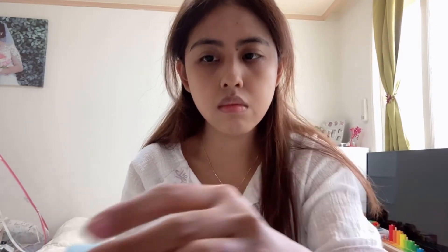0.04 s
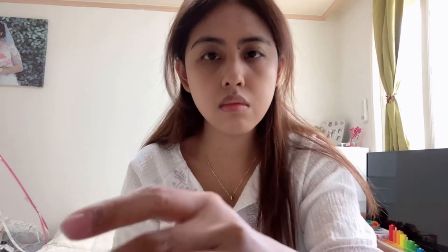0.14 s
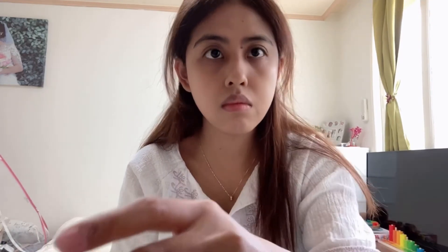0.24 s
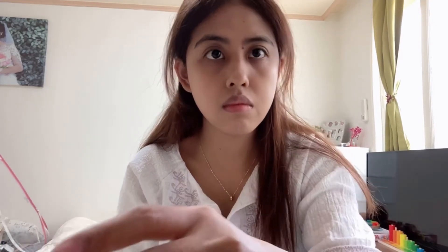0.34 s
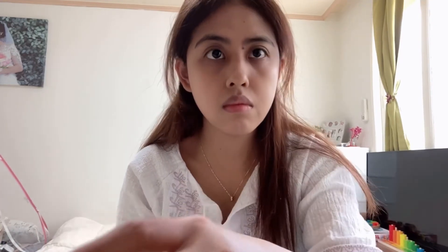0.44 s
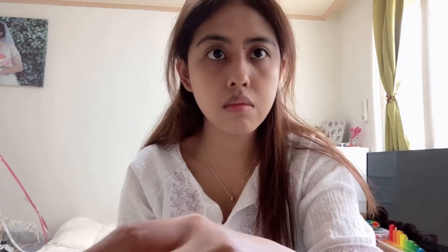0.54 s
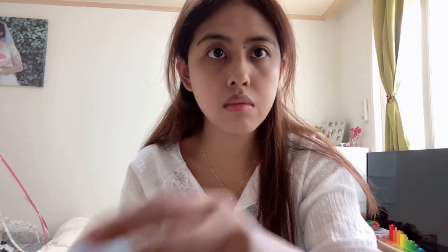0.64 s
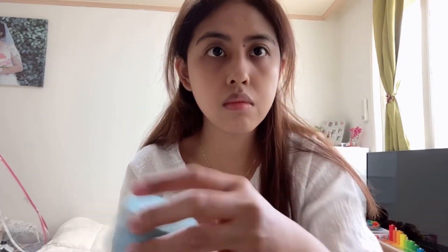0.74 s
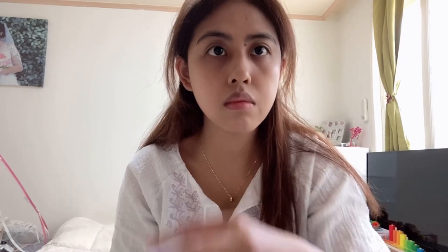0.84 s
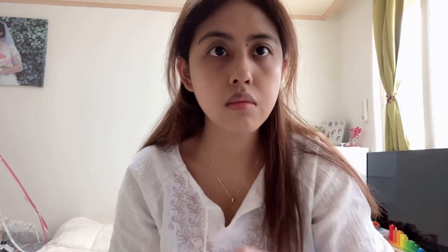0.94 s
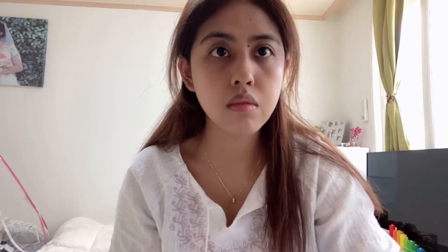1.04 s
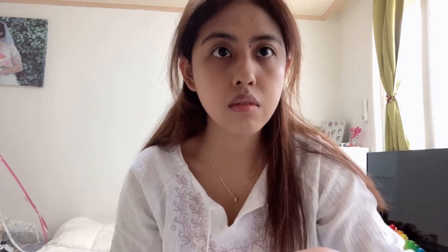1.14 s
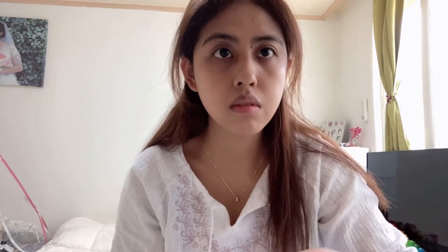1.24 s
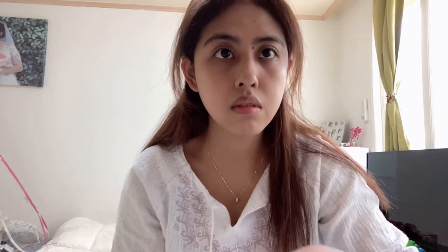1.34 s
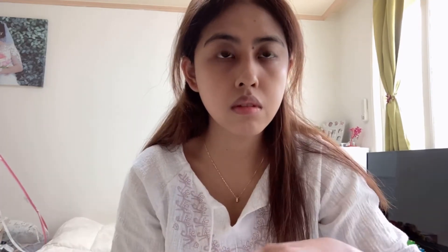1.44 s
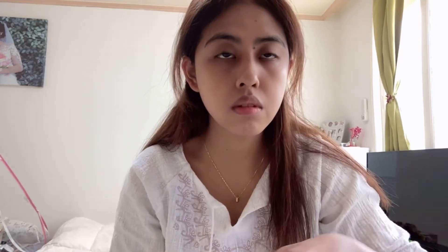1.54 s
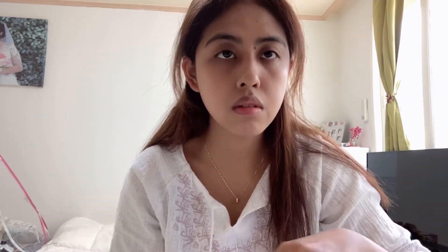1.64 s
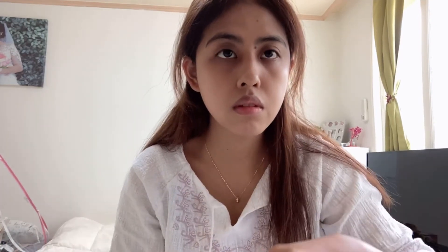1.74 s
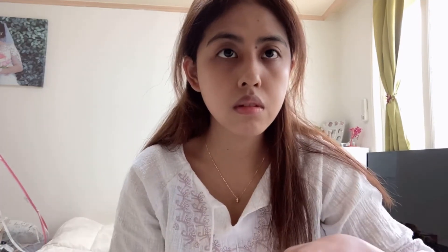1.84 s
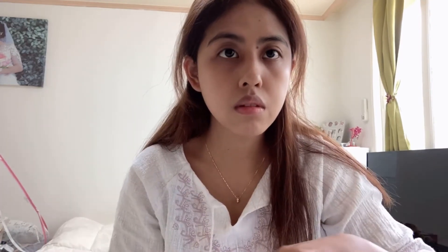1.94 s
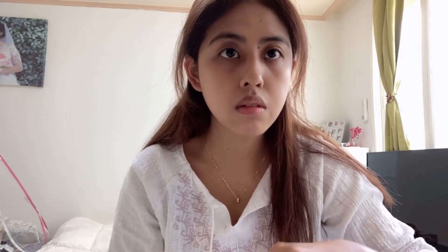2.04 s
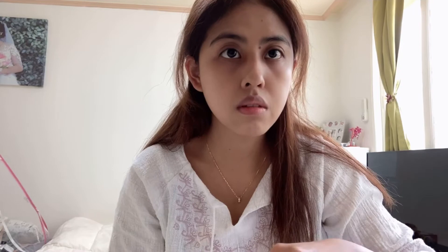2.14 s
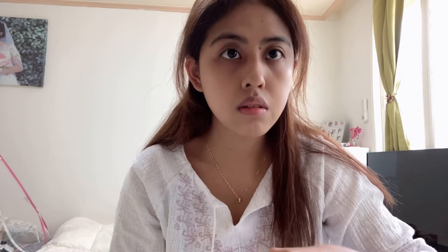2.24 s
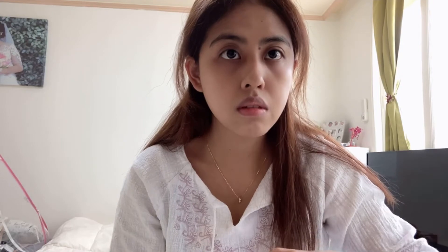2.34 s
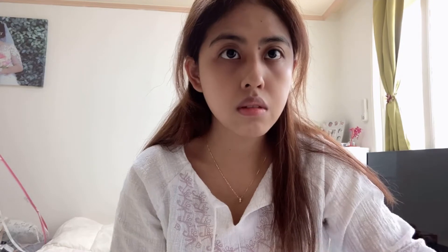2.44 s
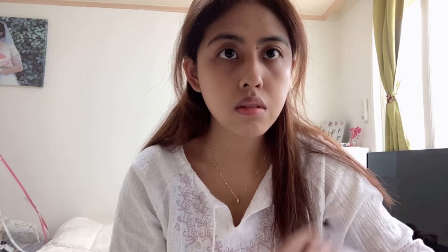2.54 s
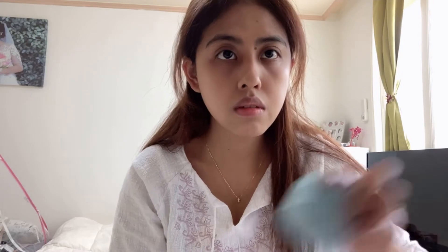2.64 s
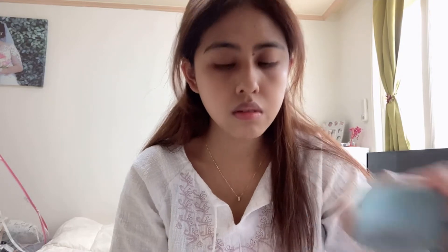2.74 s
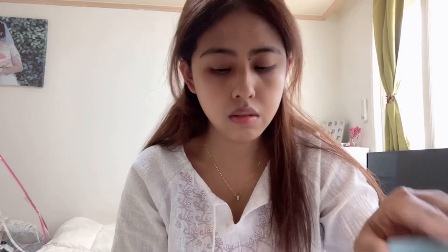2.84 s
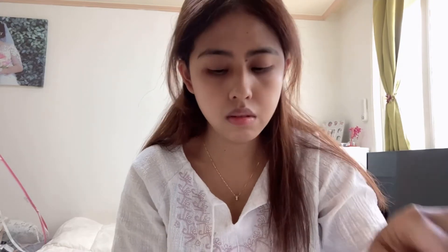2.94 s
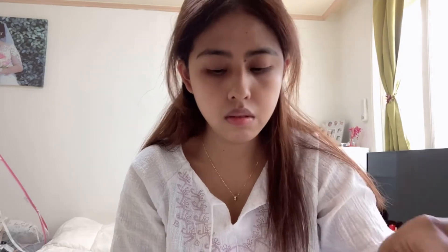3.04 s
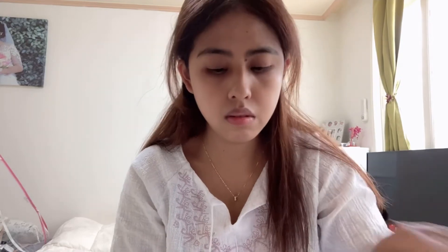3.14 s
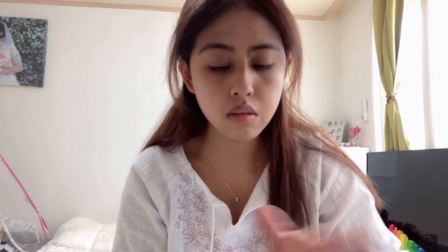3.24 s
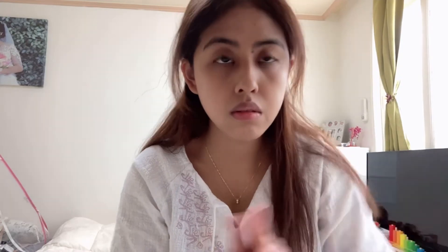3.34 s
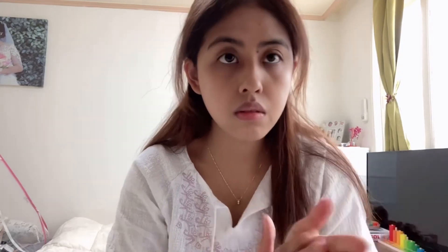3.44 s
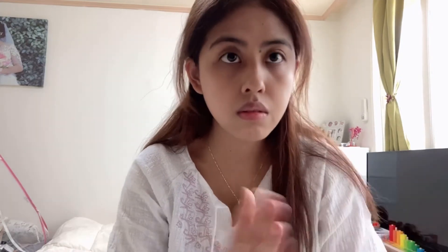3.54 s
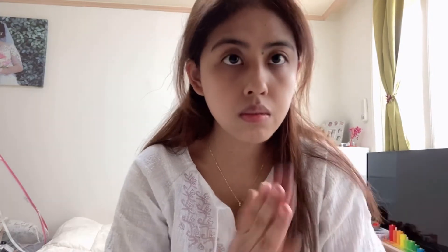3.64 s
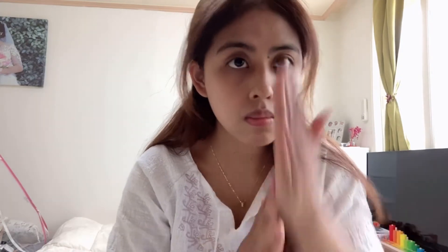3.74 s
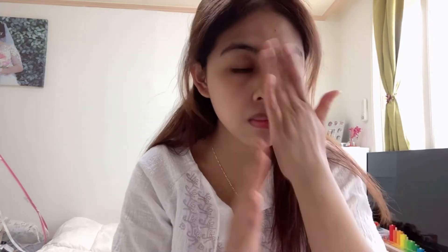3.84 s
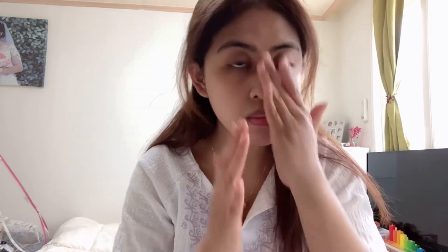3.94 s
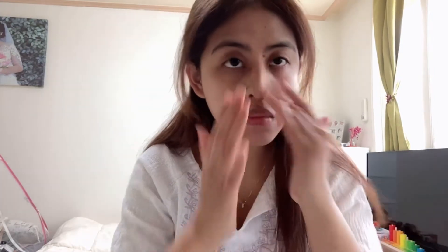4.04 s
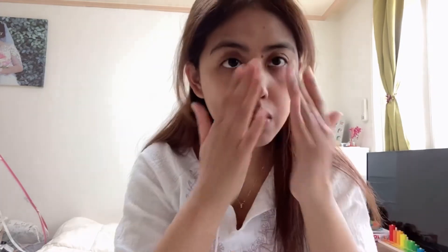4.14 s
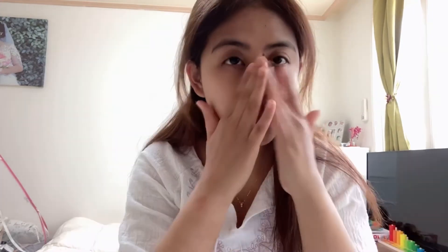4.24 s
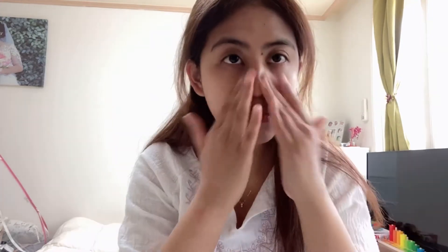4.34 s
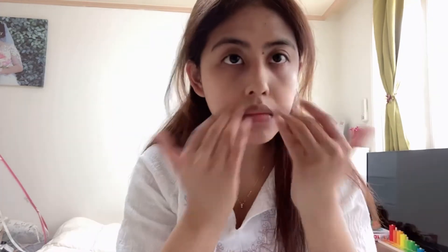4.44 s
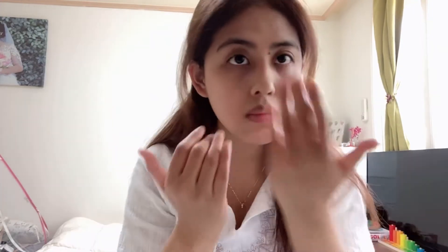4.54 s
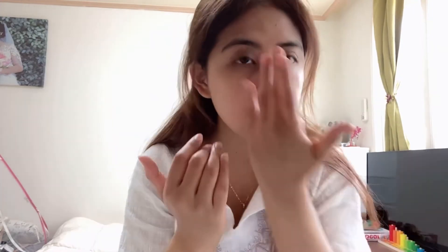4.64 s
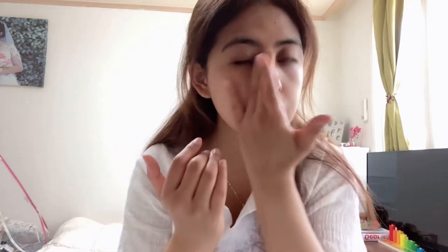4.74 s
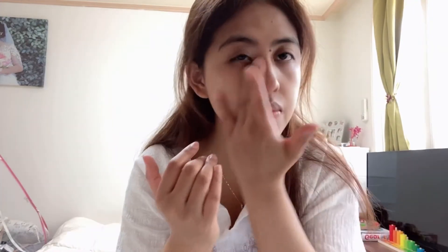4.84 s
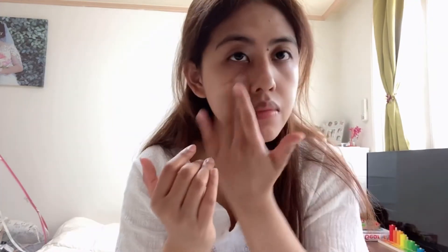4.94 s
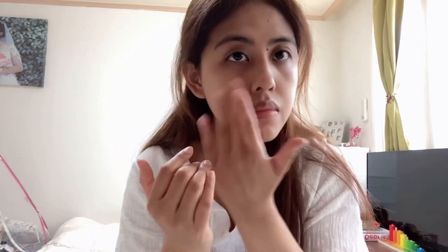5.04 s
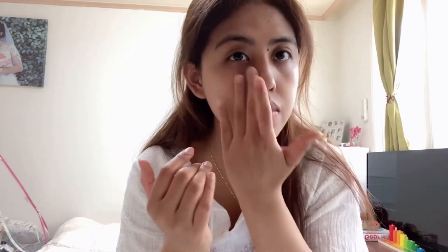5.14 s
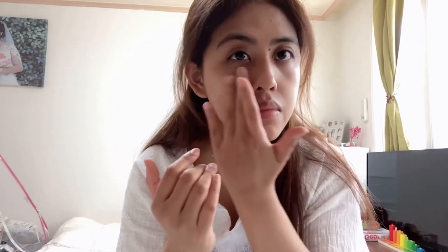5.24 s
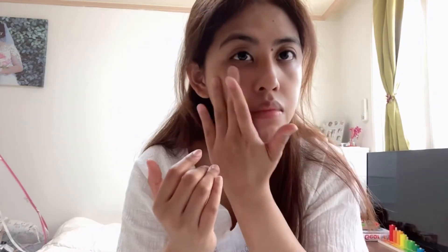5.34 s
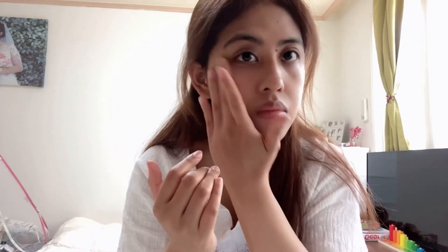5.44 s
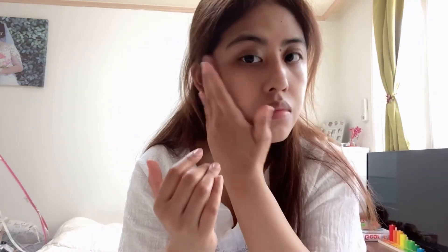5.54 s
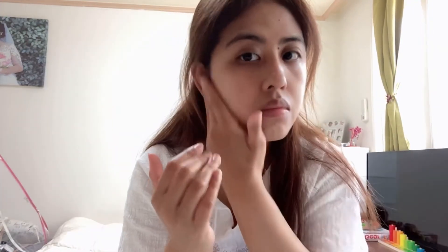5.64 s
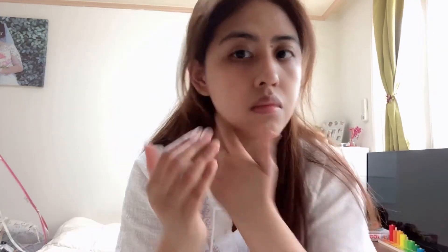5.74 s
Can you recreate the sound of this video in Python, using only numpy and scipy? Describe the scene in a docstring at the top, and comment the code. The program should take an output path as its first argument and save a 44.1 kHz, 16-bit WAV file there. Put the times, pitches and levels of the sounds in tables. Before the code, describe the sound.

A quiet small room with a low steady hum and light hiss, heard from close by. From about 0.1 to 0.5 s a hollow plastic bottle is handled: a quick cluster of knocks, taps and short scrapes, with dull bumps on a wooden table. After a lull, the pump works between 1.05 and 2.05 s: a soft sliding hiss, a crisp plastic click at 1.4, another at 1.5, a scrape and clicks near 1.7, then a lighter slide around 2.0. Faint birds chirp thinly outside until about 2.8 s. A faint brush at 2.7 leads to the loudest sound, a hard woody knock at 2.9 with a smaller one at 3.0. Palms meet softly at 3.2 and rub in airy, slightly hollow swishes until 3.7. Afterwards only barely audible finger strokes on skin, near 3.9, 4.3, 4.8 and 5.5, and a slight low rustle at the end.

```python
"""A quiet room with a wooden table: a plastic pump bottle is opened, pumped three times and set down.
Then palms meet, rub together and stroke the face; birds call faintly outside and the room hums.
Taps, blows and a soft clap are sums of damped modes; friction is coloured noise under stroke gains.
Birds are gliding sines, the room's hum is shaped noise, and the walls answer with a decaying noise tail."""
import sys
import numpy as np
from scipy import signal
from scipy.fft import rfft, irfft, next_fast_len
from scipy.io import wavfile
from scipy.ndimage import uniform_filter1d, map_coordinates

SR = 44100
rng = np.random.default_rng(int(sys.argv[2]) if len(sys.argv) > 2 else 0)


def wrap_up_sound(samples):
    """Save the sound to the file named by the first command line argument, as 16-bit audio."""
    columns = np.atleast_2d(samples).T
    # keep every value between -1 and 1, then stretch to whole-number steps
    tamed = np.clip(columns, -1, 1)
    steps = np.round(tamed * 32767).astype(np.int16)
    wavfile.write(sys.argv[1], SR, steps)


N = 255780  # length in samples


def amp(db):
    """Decibel law: the amplitude ratio of a level."""
    return 10 ** (np.asarray(db) / 20)


def unit(x):
    """Normalization by power: scale to an rms of 1."""
    return x / np.sqrt(np.mean(x ** 2) + 1e-20)


def along(points, hz):
    """Logarithmic frequency scale: interpolate (Hz, value) points on it."""
    point_hz, values = np.transpose(points)
    return np.interp(np.log(hz + 1), np.log(point_hz + 1), values)


def wobble(rate):
    """Band-limited random modulation: a smooth curve through `rate` random knots a second."""
    knots = rng.standard_normal(int(N * rate / SR) + 4)
    return map_coordinates(knots, [np.arange(N) * rate / SR])


def filtered(x, response):
    """Linear filtering: multiply the spectrum by a response of frequency."""
    size = next_fast_len(N + SR // 2)
    return irfft(rfft(x, size) * response(np.fft.rfftfreq(size, 1 / SR)), size)[:N]


def rush(spectrum, patchy_db, grain_db):
    """Noise shaping: coloured noise of rms 1, with random patches and a fast grain."""
    grainy = rng.standard_normal(N) * amp(grain_db * wobble(300))
    z = signal.stft(grainy, nperseg=512)[2]
    patches = uniform_filter1d(rng.standard_normal(z.shape), 6, axis=0)
    patches = uniform_filter1d(patches, 8, axis=1)
    x = signal.istft(z * amp(patchy_db * unit(patches)), nperseg=512)[1][:N]
    return unit(filtered(x, lambda hz: amp(along(spectrum, hz))))


def strokes(rows, catch_s, catch_db):
    """Amplitude envelope: the gain of strokes that catch fast, swell to a peak, hold and fade."""
    sag_db, quiet_db = -1.5, -36  # below the peak: after the hold, at both ends
    out = np.zeros(N + SR)
    for s, swell, hold, fade, db in rows:
        catch = min(catch_s, swell / 2)
        knots = np.cumsum([0, catch, swell - catch, hold, fade])
        t = np.arange(round(knots[-1] * SR)) / SR
        shape_db = np.interp(t, knots, [quiet_db, catch_db, 0, sag_db, quiet_db])
        out[round(s * SR):][:len(t)] += amp(db + shape_db)
    return out[:N]


def ring(modes, spread_db, detune, share):
    """Modal superposition: damped sines with random strengths and shifts; share scales the ring time."""
    t = np.arange(SR // 6) / SR
    hz, db, t60 = np.transpose(modes)[..., None]
    hz = hz * (1 + detune * rng.standard_normal(hz.shape))
    db = db + spread_db * rng.standard_normal(db.shape)
    decay = amp(db - 60 * t / (share * t60))
    rise = 1 - np.exp(-t * hz / 1.2)  # low modes build up more slowly
    return (decay * np.sin(2 * np.pi * hz * t) * rise).sum(axis=0)


def dying(decay, level_db):
    """Diffuse decay: a noise burst in which each frequency dies at its own speed."""
    onset_s = .0006
    hz, t, z = signal.stft(rng.standard_normal(SR // 2), SR, nperseg=128)
    fall_db = level_db(hz)[:, None] - 60 * t / along(decay, hz)[:, None]
    x = signal.istft(z * amp(fall_db), SR, nperseg=128)[1]
    rise = np.minimum(np.arange(len(x)) / SR / onset_s, 1)
    return x * np.sin(np.pi / 2 * rise) ** 2


def add(out, s, db, sound):
    """Linear superposition: lay a sound at time s with its peak at db."""
    out[round(s * SR):][:len(sound)] += amp(db) * sound / np.abs(sound).max()


# spectrum of the room's hum and hiss: pitch_hz [Hz], level_db [relative dB per Hz]
ROOM_SPECTRUM = [(12, -39), (20, -15), (81, 1), (107, -14), (301, -13.5), (376, -23), (484, -16),
                 (526, -19.5), (1180, -29), (1320, -27), (2970, -31.5), (4520, -32.5), (5650, -34),
                 (10200, -38), (15900, -43)]
# low noise that rises at the end: start_s [s], swell_s [s], hold_s [s], fade_s [s], level_db [dB]
LATE_SWELL = [(5.69, 0.024, .08, .1, -58)]
# spectrum of that low noise: pitch_hz [Hz], level_db [relative dB per Hz]
SWELL_SPECTRUM = [(110, -39.5), (180, -22), (234, -3), (333, 1), (690, -11), (745, -20), (2500, -25),
                  (3250, -55), (5500, -120)]


def air():
    """Stationary background noise: the room's hum and hiss, with a low noise rising at the end."""
    steady = amp(-59) * rush(ROOM_SPECTRUM, patchy_db=1.2, grain_db=0.5)
    low_noise = rush(SWELL_SPECTRUM, patchy_db=0.5, grain_db=-0.5)
    return steady + strokes(LATE_SWELL, catch_s=.026, catch_db=-7) * low_noise


# bird notes: start_s [s], length_s [s], first_hz [Hz], last_hz [Hz], level_db [dB before flutter]
BIRD_NOTES = [(0.087, 0.042, 5400, 5000, -72), (0.125, 0.094, 4150, 3550, -69.5),
              (0.649, 0.07, 3450, 3200, -72), (.74, .03, 3350, 3300, -71), (.425, 0.033, 4750, 4460, -61),
              (0.458, 0.04, 4100, 4030, -68), (1.385, 0.023, 4300, 4200, -76),
              (1.428, .015, 4500, 4460, -83), (1.83, 0.034, 4510, 4420, -62),
              (2.079, 0.019, 6530, 6340, -66.5), (2.113, 0.015, 5380, 5200, -60),
              (2.125, 0.034, 4900, 3940, -63), (2.249, 0.026, 4330, 4760, -64.5),
              (2.3, 0.058, 3450, 3250, -70), (2.478, 0.062, 4700, 3830, -65.5),
              (2.677, .03, 5250, 5380, -71), (2.704, 0.1, 4440, 3600, -75)]


def birds():
    """Frequency modulation: short unsteady whistles whose pitch moves fast and then levels."""
    out = np.zeros(N)
    for s, length, first_hz, last_hz, db in BIRD_NOTES:
        u = np.linspace(0, 1, round(length * SR))
        pitch_hz = last_hz + (first_hz - last_hz) * (1 - u) ** 2
        swell = np.sin(np.pi * np.sqrt(u)) ** 2  # rises faster than it falls
        whistle = np.sin(2 * np.pi * np.cumsum(pitch_hz) / SR)
        out[round(s * SR):][:len(u)] += amp(db) * swell * whistle
    flutter = amp(2.8 * wobble(78))
    return out * flutter


# palm on palm: start_s [s], swell_s [s], hold_s [s], fade_s [s], level_db [dB at the peak],
# first_hz [Hz], last_hz [Hz] of the hollow between the palms
PALM_RUBS = [(3.222, 0.011, 0.0042, .07, -50, 2520, 2500), (3.245, 0.066, 0.042, 0.041, -53, 2520, 2010),
             (3.372, .065, 0.055, 0.033, -45, 2720, 2320), (3.518, 0.066, 0.035, .17, -43, 2870, 2710)]
# spectrum of rubbing palms: pitch_hz [Hz], level_db [relative dB per Hz]
PALM_SPECTRUM = [(530, -63), (900, -34), (1240, -12.5), (2060, -5.5), (2380, -4.5), (2680, -12), (3020, -1),
                 (3490, -9), (4280, -8.5), (5240, -2), (11700, -5), (14400, -3), (15800, -11.5)]
# fingers on skin: start_s [s], swell_s [s], hold_s [s], fade_s [s], level_db [dB at the peak]
FINGER_STROKES = [(.745, .09, .03, .08, -71.5), (.9, .025, 0.012, .06, -69.5), (2.655, .1, .03, .15, -62),
                  (3.85, .03, 0.033, .12, -67), (3.945, .03, .015, .1, -65), (4.18, 0.17, .03, .08, -59),
                  (4.72, .12, .04, .13, -64), (5.355, .09, 0.083, 0.17, -66.5), (5.52, .1, .05, 0.09, -63)]
# spectrum of fingers on skin: pitch_hz [Hz], level_db [relative dB per Hz]
FINGER_SPECTRUM = [(1470, -36.5), (2500, -10.5), (2850, -6.5), (4600, -11), (7950, -5), (9720, -6.5),
                   (15800, -6)]


def hands():
    """Cavity resonance: cupped palms colour their friction as their shape moves; fingers whisper."""
    hz, t, z = signal.stft(rush(PALM_SPECTRUM, patchy_db=1.5, grain_db=.8), SR, nperseg=512)
    cup = []
    for s, swell, hold, fade, db, first_hz, last_hz in PALM_RUBS:
        cup += [(s, first_hz), (s + swell + hold, last_hz)]
    cup_hz = np.interp(t, *np.transpose(sorted(cup)))
    hollow = 1 + amp(1.5) * np.exp(-((hz[:, None] - cup_hz) / 350) ** 2)  # 350 Hz sets the width
    palm_noise = unit(signal.istft(z * hollow, SR, nperseg=512)[1][:N])
    palm_gain = strokes([row[:-2] for row in PALM_RUBS], catch_s=.026, catch_db=-7)
    finger_noise = rush(FINGER_SPECTRUM, patchy_db=2.0, grain_db=0.54)
    finger_gain = strokes(FINGER_STROKES, catch_s=.025, catch_db=-11)
    return palm_gain * palm_noise + finger_gain * finger_noise


# plastic sliding on plastic in the cap and the pump: start_s [s], swell_s [s], hold_s [s], fade_s [s],
# level_db [dB of the hiss at the peak], shake_db [dB of the shaken shell above the hiss]
PLASTIC_SLIDES = [(0.206, .012, .004, .03, -65, -7), (.25, 0.034, .02, 0.051, -61, 6),
                  (0.31, 0.016, .035, 0.092, -54, -3), (0.38, .07, .008, .05, -56.5, -12),
                  (1.064, 0.05, 0.1, .17, -50.5, 0.5), (1.296, .014, .004, 0.063, -65, -10),
                  (1.405, 0.0086, .003, .03, -39.5, -24), (1.421, 0.011, .09, .09, -49.5, -21),
                  (1.671, .05, 0.011, 0.084, -44, -8), (1.971, 0.018, 0.0043, 0.072, -51, -7),
                  (2.026, 0.032, .01, 0.083, -61, -1)]
# spectrum of the sliding hiss: pitch_hz [Hz], level_db [relative dB per Hz]
SLIDE_SPECTRUM = [(1290, -34.5), (2200, -9), (2490, -6), (2860, -7), (3160, -1.5), (3980, -11.5),
                  (5630, -10.5), (6480, -9.5), (7160, -9.5), (10200, -6), (12600, -10), (14200, -1.5),
                  (15800, -15)]
# modes of the bottle's shell: pitch_hz [Hz], level_db [relative dB], t60_s [s before damping share]
SHELL_MODES = [(1080, -13, .03), (1318, -0.5, 0.039), (1393, -1.5, 0.041), (1496, -0.5, 0.088),
               (1640, 3.5, 0.05), (1670, -6.5, .03)]


def slides():
    """Friction excitation: sliding hisses and, in coarse jerks, shakes the shell of the bottle."""
    jerks = rng.standard_normal(N) * amp(4.6 * wobble(150))
    shell = ring(SHELL_MODES, spread_db=0, detune=0, share=.4)
    shaken = unit(signal.fftconvolve(jerks, shell)[:N])
    hiss = rush(SLIDE_SPECTRUM, patchy_db=1.5, grain_db=1.5)
    hiss_rows = [row[:-1] for row in PLASTIC_SLIDES]
    shake_rows = [(*shape, db + shake_db) for *shape, db, shake_db in PLASTIC_SLIDES]
    hiss_gain = strokes(hiss_rows, catch_s=.012, catch_db=-7.5)
    shake_gain = strokes(shake_rows, catch_s=.012, catch_db=-7.5)
    return hiss_gain * hiss + shake_gain * shaken


# taps on the bottle; the last row is the palms meeting in a soft clap:
# start_s [s], then the peak of each mode set: shell_db, boom_db, knock_db, click_db [dB]
TAPS_AND_CLAP = [(0.1244, -33, -32.5, -32.5, -62), (0.1865, -41, -28.5, -36.5, -85),
                 (0.2145, -23.5, -54, -25, -51), (0.2184, -40, -28.5, -48, -47),
                 (0.255, -19, -37, -26, -71), (0.2742, -21.5, -27, -22, -41),
                 (0.3081, -18.5, -15.5, -19, -48), (0.3291, -43, -30.5, -32, -37),
                 (0.3478, -31, -28, -29, -34.5), (0.365, -60, -35, -23.5, -43), (0.383, -58, -34, -58, -67),
                 (0.7985, -60, -47, -66, -62), (1.0545, -64, -45.5, -50.5, -59),
                 (1.1943, -39, -45.5, -40.5, -59.5), (1.2692, -62, -42, -47, -70.5),
                 (1.3142, -54, -54, -59, -68), (1.4069, -14.5, -32.5, -21, -21.5),
                 (1.4344, -54, -53, -51, -49), (1.473, -40.5, -58, -39, -63),
                 (1.49, -20.5, -33.5, -26.5, -34), (1.6761, -24, -33.5, -33, -47),
                 (1.7158, -21.5, -34, -27.5, -25), (1.9315, -44.5, -48, -45.5, -59),
                 (1.9574, -49, -47.5, -46, -63.5), (1.9847, -31.5, -43, -36.5, -42.5),
                 (3.2289, -55, -42.5, -44, -43)]
# modes of the table's boom, the bottle's knock and the hard click:
# pitch_hz [Hz], level_db [relative dB], t60_s [s before damping share]
BOOM_MODES = [(115.5, -4.5, 0.15), (158.9, -4.5, 0.084), (202.8, -3, .11), (241.6, -3, 0.08)]
KNOCK_MODES = [(327.4, -4, 0.025), (440, -3.5, 0.04), (501.7, 2, 0.044), (595.6, 3.5, 0.042),
               (690, 1, 0.03), (794, -12, 0.024)]
CLICK_MODES = [(2280, -4, .015), (2640, -1, .015), (2900, -1, .015), (3230, -1, .018), (3600, -6, .012),
               (4300, -8, .01), (5000, -8, .01), (5600, -8, .01), (6700, -14, .008), (8400, -16, .008)]


def hits():
    """Forced vibration: a rough push swells and stops, driving four mode sets; the clap shares them."""
    contact_s, ring_share = 0.0046, 0.49  # time scale of the push; share of the ring time left
    out, t = np.zeros(N + SR), np.arange(SR // 10) / SR
    u = t / contact_s
    rattle = amp(-32) * np.exp(-t / .02)  # a weak rattle follows the push
    swell = (1 - np.exp(-u / 0.14)) * (np.exp(-u ** 2) + rattle)
    for s, *levels_db in TAPS_AND_CLAP:
        for db, modes in zip(levels_db, (SHELL_MODES, BOOM_MODES, KNOCK_MODES, CLICK_MODES)):
            push = swell * rng.standard_normal(len(t))
            body = ring(modes, spread_db=2, detune=.025, share=ring_share)
            add(out, s, db, signal.fftconvolve(push, body))
    return out[:N]


# bottle landing on the table: start_s [s], knock_db, boom_db, top_db [dB at the peak],
# soft_db [dB per octave, well above 1 kHz], share [ratio of knock and boom ring time]
LANDINGS = [(0.2984, -12.5, -21, -23.5, 3.5, 1.65), (0.4232, -19.5, -17, -35.5, 9, 0.68),
            (.502, -21.5, -26, -31, 8, 0.75), (2.9164, 0.5, -12.5, -4, -1, 0.96),
            (3.0104, -11, -27.5, -11, 7, 1.04)]
# the table top's many close modes: pitch_hz [Hz], level_db [relative dB per Hz]
TOP_SPECTRUM = [(470, -31), (800, -9.5), (1230, -4), (1380, -9.5), (1480, -2), (1770, -3), (2170, -19.5),
                (2660, -8.5), (3490, -18.5), (5810, -24.5), (12000, -42), (15600, -76.5), (22000, -120)]
# decay of the table top: pitch_hz [Hz], t60_s [s]
TOP_DECAY_TIMES = [(800, 0.058), (2000, 0.035), (4000, 0.05), (10000, 0.023)]


def landings():
    """Modal density: a blow's low modes ring clear, its high ones crowd into a clatter softness dulls."""
    out = np.zeros(N + SR)
    for s, knock_db, boom_db, top_db, soft_db, share in LANDINGS:
        add(out, s, knock_db, ring(KNOCK_MODES, spread_db=5.5, detune=0.003, share=share))
        add(out, s, boom_db, ring(BOOM_MODES, spread_db=5.0, detune=0.015, share=share))
        clatter = dying(TOP_DECAY_TIMES,
                        lambda hz: along(TOP_SPECTRUM, hz) - soft_db * np.log2(1 + hz / 1000))
        add(out, s, top_db, clatter)
    return out[:N]


# reverberation of the walls: pitch_hz [Hz], t60_s [s]
WALL_DECAY = [(100, 0.42), (500, 0.31), (2000, 0.29), (6000, 0.37), (14000, 0.13)]


def room(x, count=8):
    """Reverberation: the walls answer with a decaying noise tail, drawn afresh for each block of time."""
    out, size = np.zeros(N + SR), N // count
    for k in range(count):
        tail = dying(WALL_DECAY, np.zeros_like)
        delayed = np.pad(x[k * size:][:size], (250, 0))  # samples before the walls answer
        wet = signal.fftconvolve(delayed, tail / np.linalg.norm(tail))
        out[k * size:][:len(wet)] += wet
    return out[:N]


def scene():
    """Superposition of direct and reverberant sound: all sources with the answer of the walls."""
    background, far = air(), birds()
    rubbing = hands() + slides()
    taps, blows = hits(), landings()
    wet = room(amp(-13) * taps + amp(-17.0) * blows + amp(-16.5) * rubbing + amp(-1) * far)
    # small things radiate no deep bass: third-order high-pass at 70 Hz
    close = filtered(taps + blows + wet, lambda hz: (1j * hz / (70 + 1j * hz)) ** 3)
    return (close + rubbing + far + background)[None]


def record(dry):
    """Saturation and band limiting: the recorder rounds off the loudest peaks and cuts the top."""
    ceiling, top_hz = .92, 15800  # amplitude; Hz
    soft = dry[0] / (1 + np.abs(dry[0] / ceiling) ** 6) ** (1 / 6)
    return filtered(soft, lambda hz: hz < top_hz)[None]


dry = scene()
out = record(dry)
wrap_up_sound(out)
```